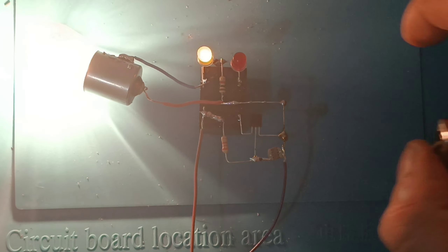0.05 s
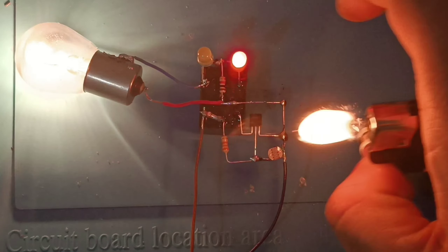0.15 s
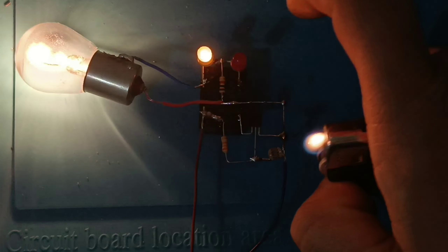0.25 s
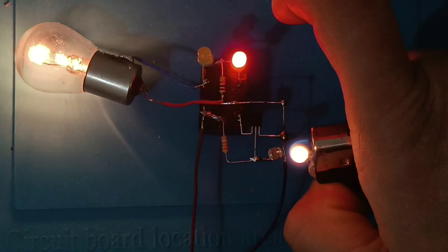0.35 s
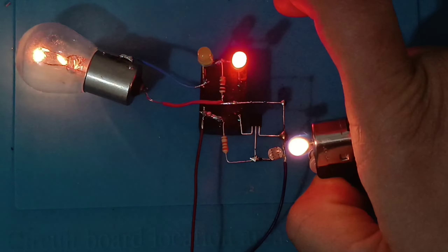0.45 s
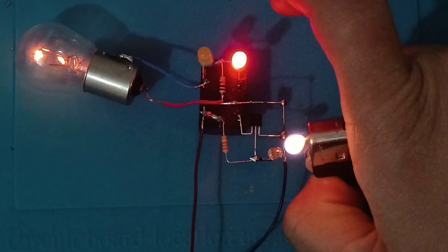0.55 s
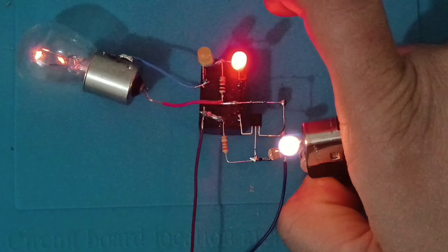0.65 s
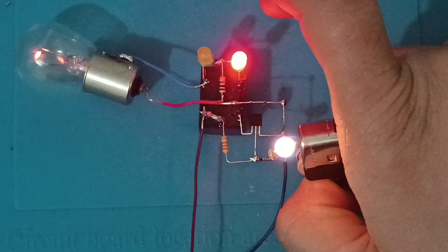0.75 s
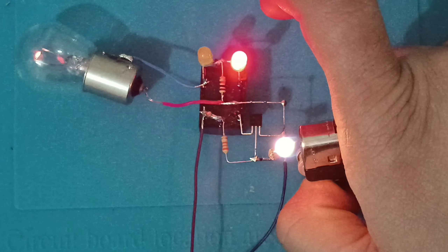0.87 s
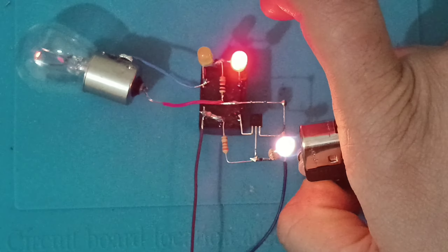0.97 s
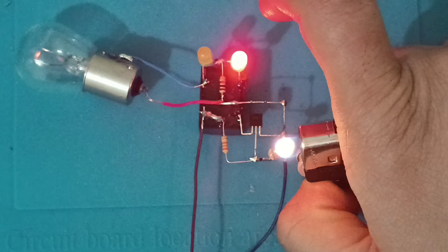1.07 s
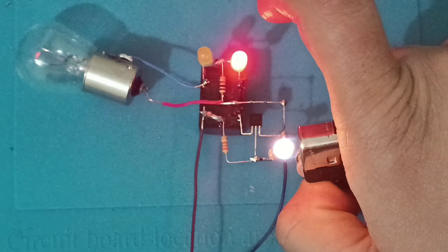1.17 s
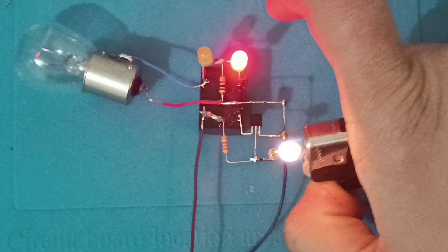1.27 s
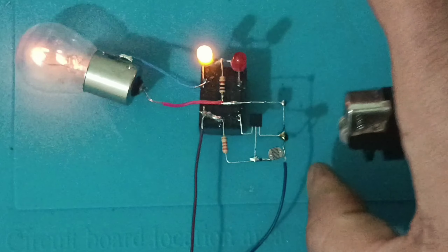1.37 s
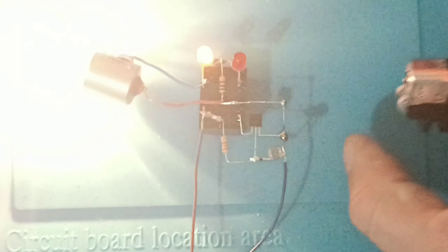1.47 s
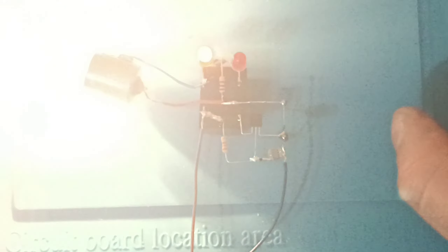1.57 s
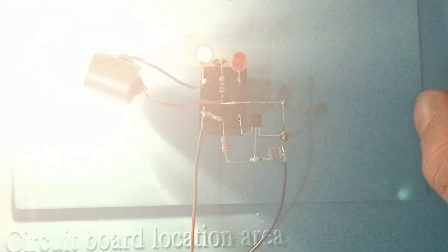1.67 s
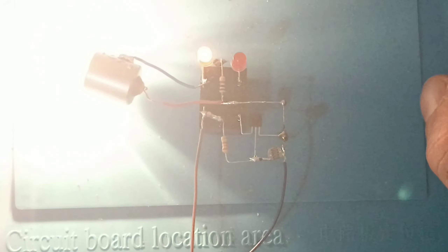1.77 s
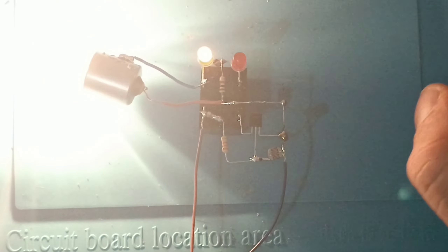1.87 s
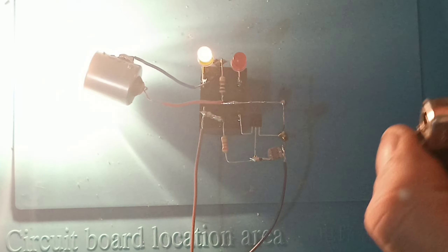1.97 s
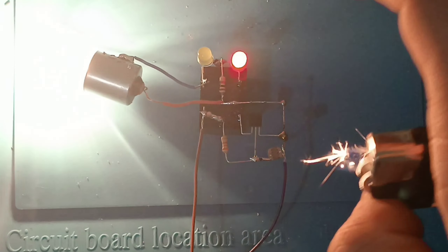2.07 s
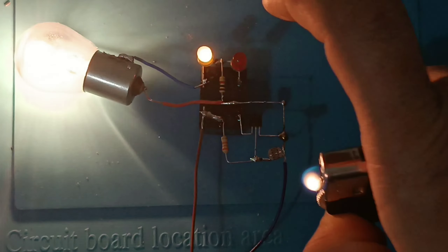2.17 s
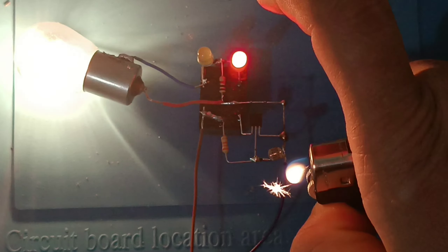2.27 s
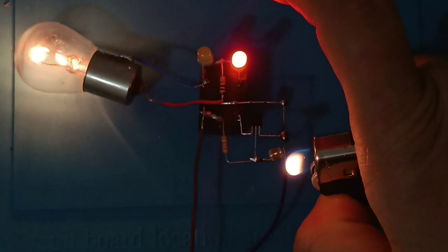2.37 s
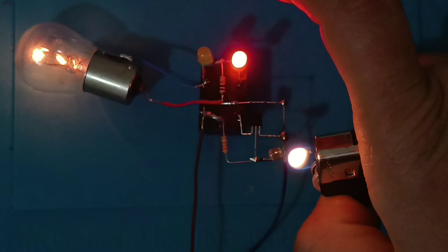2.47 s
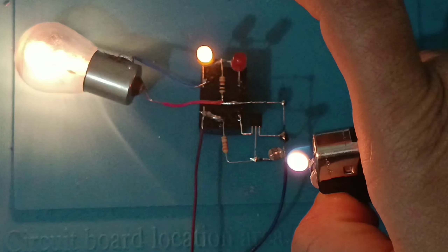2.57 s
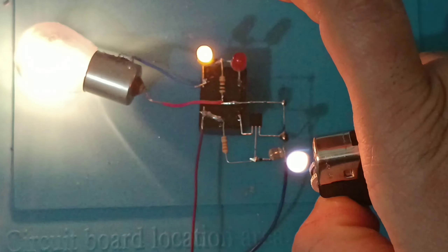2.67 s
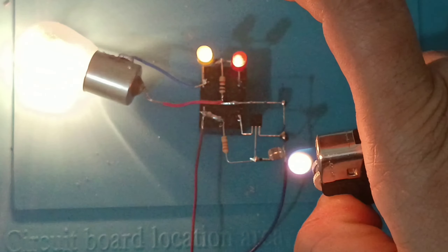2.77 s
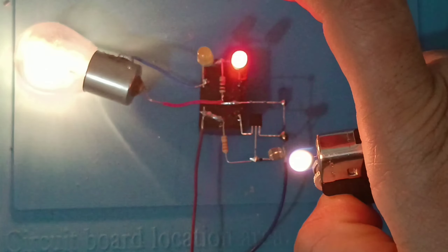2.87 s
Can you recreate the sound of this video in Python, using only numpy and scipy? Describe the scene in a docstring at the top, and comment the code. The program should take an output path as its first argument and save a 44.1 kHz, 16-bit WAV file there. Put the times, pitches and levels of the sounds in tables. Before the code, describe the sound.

Close stereo microphone in a small, lively room: two scratchy lighter strikes about two seconds apart, each followed by tiny relay clicks, the second ending in fluttering relay chatter, with soft hand bumps and faint room tone.

```python
"""Faint room tone comes first; then a flint wheel rasps and a thumb thuds onto the gas lever of a lighter.
The lighter is struck twice, close to the microphone, beside a light sensor on a table in a small live room.
A relay clicks as the flame comes and goes, and chatters when the light hovers at its threshold.
Rasp, clicks and creaks are noise bursts given the colour and ring of their bodies; the thud is a short low
wave with a boom and hum after it. The hand bumps softly and a faint tone passes."""
import sys
import numpy as np
from scipy import signal
from scipy.fft import rfft, irfft, next_fast_len
from scipy.io import wavfile
from scipy.ndimage import map_coordinates

SR = 44100
rng = np.random.default_rng(int(sys.argv[2]) if len(sys.argv) > 2 else 0)


def materialize(psi):
    """Save the field psi as 16-bit PCM at rate SR to the path in sys.argv[1].

    A 1-D psi becomes a single channel; in a 2-D psi each row is a channel.
    """
    bounded = np.clip(np.atleast_2d(psi).T, -1, 1)
    quanta = np.round(bounded * 32767).astype(np.int16)
    wavfile.write(sys.argv[1], SR, quanta)


N = 127890  # samples, 2.9 s
TOP_HZ = 15560  # upper band limit


def amp(db):
    """Turn decibels into a gain."""
    return 10 ** (np.asarray(db) / 20)


def unit(x):
    """Scale x to an average (rms) strength of 1."""
    return x / np.sqrt(np.mean(x ** 2) + 1e-20)


def clock():
    """The time of each sample, in seconds."""
    return np.arange(N) / SR


def along(points, hz):
    """Read a curve of (frequency, value) points on a logarithmic frequency axis."""
    point_hz, values = np.transpose(points)
    return np.interp(np.log(hz + 1), np.log(point_hz + 1), values)


def filtered(x, response):
    """Multiply the spectrum of x by a response that depends on frequency."""
    length = x.shape[-1]
    padded = next_fast_len(length + 8192)
    spectrum = rfft(x, padded) * response(np.fft.rfftfreq(padded, 1 / SR))
    return irfft(spectrum, padded)[..., :length]


def convolved(x, response):
    """Pass x through an impulse response, the sound a body makes when tapped once."""
    return signal.fftconvolve(np.atleast_2d(x), np.atleast_2d(response), axes=1)[:, :N]


# how alike left and right are in the close sounds: (frequency [Hz], likeness [0 to 1])
ALIKE = [(50, .4), (110, .72), (170, .92), (380, .92), (750, .6), (1500, .15), (4000, 0)]


def noise(size, alike=ALIKE):
    """Stereo hiss from a shared middle and an opposed side, mixed to set the likeness at each frequency."""
    def mid_side_gains(hz):
        angle = np.arccos(np.clip(along(alike, hz), -1, 1)) / 2
        return np.array([np.cos(angle), np.sin(angle)])

    mid, side = filtered(rng.standard_normal((2, size)), mid_side_gains)
    return np.array([mid + side, mid - side])


def body(spectrum, size=4096):
    """An impulse response of energy 1 with the given colour, starting at once (minimum phase)."""
    hz = np.fft.rfftfreq(size, 1 / SR)
    level_db = along(spectrum, hz) - 30 * (hz > TOP_HZ + 500)
    cepstrum = irfft(np.log(amp(level_db)))
    # folding the second half onto the first leaves no sound before the tap
    cepstrum[1:size // 2] *= 2
    cepstrum[size // 2 + 1:] = 0
    response = irfft(np.exp(rfft(cepstrum)))
    return response / np.linalg.norm(response)


def ringing(x, modes, t60, ring_db):
    """Add to x the fading sine tones (modes) that it sets ringing; t60 is the time to fade by 60 dB."""
    t = np.arange(SR // 3) / SR
    ring = 0
    for hz, db in modes:
        phase = rng.random((2, 1))  # in turns, separate for left and right
        ring = ring + amp(db - 60 * t / t60) * np.sin(2 * np.pi * (hz * t + phase))
    return x + amp(ring_db) * convolved(x, ring / np.linalg.norm(ring[0]))


RATTLE_T60 = 0.028  # s


def contacts(rows, crack_t60, rattle_db):
    """Noise bursts at the (time, level) rows: each a quick crack and a rattle that fades over RATTLE_T60."""
    t = np.arange(SR // 8) / SR
    crack = amp(-60 * t / crack_t60)
    rattle = amp(rattle_db - 60 * t / RATTLE_T60)
    power = np.zeros(N + SR)
    for time, db in rows:
        power[round(time * SR):][:len(t)] += amp(db) ** 2 * (crack ** 2 + rattle ** 2)
    return np.sqrt(power[:N]) * noise(N)


# steady room tone: (frequency [Hz], level [dB])
FLOOR_COLOUR = [(25, -15.5), (60, 0), (90, -1), (160, -1.5), (220, -6.5), (300, -4.5), (420, -13),
                (640, -14.5), (1200, -17.5), (2400, -18.5), (4500, -27.5), (8000, -35.5), (10500, -38.5),
                (15300, -32.5)]
# how alike left and right are in the room tone: (frequency [Hz], likeness [0 to 1])
FLOOR_ALIKE = [(50, .65), (150, .75), (300, .7), (700, .45), (2000, .3), (8000, .2)]
FLOOR_DB = -63.5
TONE_HZ, TONE_S, TONE_WIDTH_S, TONE_DB = 587, 1.65, 0.13, -70  # faint passing tone, time at its peak


def background():
    """Steady room tone of coloured noise, and a faint sine tone that swells and fades once."""
    t = clock()
    swell = np.exp(-((t - TONE_S) / TONE_WIDTH_S) ** 2 / 2)
    tone = amp(TONE_DB) * swell * np.sin(2 * np.pi * TONE_HZ * t)
    room_tone = filtered(noise(N, FLOOR_ALIKE), lambda hz: amp(along(FLOOR_COLOUR, hz)))
    return amp(FLOOR_DB) * unit(room_tone) + tone


# wheel strokes: (time of the fastest moment [s], level [dB], rise [dB/s], fall [dB/s])
STROKES = [(0.228, -28, 1090.5, 850.5), (2.1619, -29.5, 1460, 615)]
# the flint catches on a tooth: (time [s], level [dB])
CATCHES = [(.2242, -18.5), (.2305, -29), (2.1567, -38), (2.1595, -21), (2.1620, -26.5), (2.1690, -30)]
# colour of wheel on flint: (frequency [Hz], level [dB])
RASP_COLOUR = [(100, -12), (350, -3.5), (600, -7.5), (1100, -9), (1900, -3.5), (3200, 3), (4800, -6.5),
               (5700, 0.5), (8500, -7), (11000, -8), (15000, -7.5)]
# ring of the lighter's hood: (frequency [Hz], level [dB])
LIGHTER_MODES = [(1900, -0.5), (2403, -7), (2560, -1), (2990, -10), (3085, 0.5), (3450, -3.5), (4080, 3),
                 (5438, -3), (5548, -3.5), (10081, -5.5)]
LIGHTER_T60, LIGHTER_RING_DB = 0.053, -13  # s, dB


def wheel(grit_per_s=900, grit_db=-0.5):
    """The wheel scrapes the flint: noise swells, wavers with the grit and cracks at each catch; the hood rings."""
    t = clock()
    stroke = 0
    for time, db, rise, fall in STROKES:
        stroke = stroke + amp(db - np.maximum(rise * (time - t), fall * (t - time)))
    # a random curve with grit_per_s points each second
    waver = map_coordinates(rng.standard_normal(N), [t * grit_per_s], order=1)
    grit = amp(grit_db * waver)
    catches = contacts(CATCHES, crack_t60=0.013, rattle_db=-20)
    scrape = stroke * grit * noise(N) + catches
    return ringing(convolved(scrape, body(RASP_COLOUR)), LIGHTER_MODES, LIGHTER_T60, LIGHTER_RING_DB)


# the thumb lands on the lever:
# (time [s], level [dB], pitch [Hz], puff level [dB], boom level [dB], hum level [dB])
THUMPS = [(.2600, -23, 190, -28.5, -40.5, -37), (2.1907, -36.5, 269, -33, -44, -53)]
# puff of thumb on plastic: (frequency [Hz], level [dB])
PUFF_COLOUR = [(40, -22.5), (110, -0.5), (230, 1), (360, 4.5), (520, -21), (780, -5), (1200, -23.5),
               (3000, -43.5)]
# low boom of table and room: (frequency [Hz], level [dB])
BOOM_COLOUR = [(40, -21.5), (65, -9.5), (95, -13.5), (130, 2), (190, -1), (260, -2.5), (330, 3),
               (450, -11.5), (750, -11), (1500, -29.5)]
THUMP_RISE_S, THUMP_FALL_S = 0.002, 0.0059
BOOM_T60, HUM_HZ, HUM_T60 = 0.37, 186.3, 0.64  # s, Hz, s; the room hums on at its strongest mode


def thumb():
    """A short low wave and a puff of noise make the dull thud; table and room boom and hum after it."""
    t, thud = clock(), np.zeros((2, N))
    for time, db, hz, puff_db, boom_db, hum_db in THUMPS:
        swell = np.exp(-np.maximum((time - t) / THUMP_RISE_S, (t - time) / THUMP_FALL_S) ** 2 / 2)
        wave = amp(db) * np.cos(2 * np.pi * hz * (t - time))
        puff = amp(puff_db) * unit(convolved(noise(N), body(PUFF_COLOUR)))
        thud += swell * (wave + puff)
        age = np.maximum(t - time, 0)
        boom = amp(boom_db - 60 * age / BOOM_T60) * unit(convolved(noise(N), body(BOOM_COLOUR)))
        hum = amp(hum_db - 60 * age / HUM_T60) * np.sin(2 * np.pi * HUM_HZ * age)
        build_up = 1 - np.exp(-age / THUMP_FALL_S)
        thud += build_up * (boom + hum)
    return thud


# relay clicks: (time [s], case knock level [dB], bright tick level [dB])
CLICKS = [(0.3514, -50, -40), (0.403, -55, -54), (0.406, -57, -57), (1.4398, -53, -46), (1.443, -46.5, -41),
          (1.4508, -41, -39), (2.2547, -42, -42), (2.26, -38, -31), (2.3508, -28.5, -33.5),
          (2.359, -31, -51), (2.7637, -48, -43), (2.7648, -44.5, -44.5), (2.848, -53, -52),
          (2.854, -48.5, -50)]
# colour of the relay case: (frequency [Hz], level [dB])
CASE_COLOUR = [(100, -38), (350, 1.5), (620, -27.5), (1000, -3.5), (1600, -14), (2600, 2), (4200, -8.5),
               (5600, 4.5), (7400, -1), (8800, -10.5), (15000, -8)]
# colour of the contact metal: (frequency [Hz], level [dB])
TICK_COLOUR = [(2000, -15.5), (6000, -5.5), (8500, -12.5), (10200, 3), (11800, -13), (14000, 4.5),
               (15500, 1.5)]
# ring of the relay case: (frequency [Hz], level [dB])
RELAY_MODES = [(2391, 1), (2629, -5), (3004, -6), (3289, 5.5), (5240, -6), (5542, 5.5), (5740, -3),
               (6050, -12), (7448, 4)]
RELAY_T60, RELAY_RING_DB = 0.031, -11  # s, dB
TICK_T60, TICK_RATTLE_DB = 0.005, -12  # s, dB


def relay():
    """The armature, the relay's moving arm, knocks the case, which rings briefly, and the contacts tick."""
    hits = np.array(CLICKS)
    knock = convolved(contacts(hits[:, [0, 1]], crack_t60=0.0016, rattle_db=-2.5), body(CASE_COLOUR))
    tick = convolved(contacts(hits[:, [0, 2]], TICK_T60, TICK_RATTLE_DB), body(TICK_COLOUR))
    return ringing(knock, RELAY_MODES, RELAY_T60, RELAY_RING_DB) + tick


# soft bumps of the hand: (time [s], width [s], level [dB])
BUMPS = [(.40, 0.087, -53.5), (1.49, 0.082, -64), (2.24, 0.033, -51.5), (2.41, 0.065, -59),
         (2.61, 0.017, -54.5), (2.675, 0.034, -54.5), (2.82, 0.045, -57.5)]
# colour of the bumps: (frequency [Hz], level [dB])
HAND_COLOUR = [(25, -24.5), (65, -13.5), (100, -1), (170, 3), (240, -5.5), (320, -5), (500, -20.5),
               (1200, -39.5)]


def handling():
    """Soft low swells of noise as the hand shifts."""
    t, level = clock(), 0
    for time, width, db in BUMPS:
        level = level + amp(db) * np.exp(-((t - time) / width) ** 2 / 2)
    return level * unit(convolved(noise(N), body(HAND_COLOUR)))


# the lever slides back up under the thumb: (time [s], level [dB])
SLIPS = [(1.3975, -50.5), (1.402, -47.5), (1.408, -57), (1.4165, -51.5), (1.4225, -57), (1.427, -76)]
# colour of the lever: (frequency [Hz], level [dB])
LEVER_COLOUR = [(150, -23), (800, -11.5), (2100, -3.5), (2700, -9), (3300, 4.5), (5000, -13.5), (8000, -18),
                (15000, -29)]


def lever():
    """The gas lever creaks back in a few small slips, each a burst of noise."""
    return convolved(contacts(SLIPS, crack_t60=0.025, rattle_db=-11), body(LEVER_COLOUR))


# relay chatter:
# (start time [s], length [s], knock level at the start [dB], knock level at the end [dB], tick level [dB])
CHATTER = [(2.583, 0.05, -46, -43.5, -42), (2.629, .038, -42, -51, -47.5), (2.699, 0.017, -67, -43, -51.5),
           (2.849, 0.0089, -52, -48, -40), (2.88, 0.011, -51, -41.5, -50)]
# colour of the case under light, fast taps: (frequency [Hz], level [dB])
BUZZ_COLOUR = [(100, -43), (330, 0.5), (700, -15), (1800, -14), (2500, 3), (3500, -0.5), (4900, -5.5),
               (5800, 1), (7400, -2), (8600, -10), (15000, -18)]
CHATTER_PER_S = 190  # average taps per second
CHATTER_SCATTER, CHATTER_SPREAD_DB = 0.58, 1.6  # random timing [tap spacings], random level [dB]
CHATTER_T60, CHATTER_RATTLE_DB = 0.004, -6  # s, dB


def chatter(count=24):
    """The armature flutters: bursts of light taps, uneven in timing and level, knock the case and tick."""
    taps = []
    for start, length, first_db, last_db, tick_db in CHATTER:
        late, loud = rng.standard_normal((2, count))
        age = np.maximum(np.arange(count) + CHATTER_SCATTER * late, 0) / CHATTER_PER_S
        spread_db = CHATTER_SPREAD_DB * loud
        knock_db = np.interp(age, [0, length], [first_db, last_db]) + spread_db
        burst = np.transpose([start + age, knock_db, tick_db + spread_db])
        taps += list(burst[age < length])
    taps = np.array(taps)
    knock = convolved(contacts(taps[:, [0, 1]], CHATTER_T60, CHATTER_RATTLE_DB), body(BUZZ_COLOUR))
    tick = convolved(contacts(taps[:, [0, 2]], TICK_T60, TICK_RATTLE_DB), body(TICK_COLOUR))
    return knock + tick


# how long the room's tail takes to fade by 60 dB: (frequency [Hz], time [s])
ROOM_T60 = [(100, 0.32), (200, 0.57), (700, .45), (2500, 0.42), (6000, 0.32), (14000, 0.17)]
ROOM_BUILD_S = 0.0037


def room(x, wet_db, count=10):
    """Add the room's tail of fading noise, redrawn for each of count stretches so that it varies a little."""
    out = x.copy()
    for part in np.array_split(np.arange(N), count):
        hz, t, grid = signal.stft(noise(SR * 2 // 3), SR, nperseg=256)
        build_up = 1 - np.exp(-t / ROOM_BUILD_S)
        fade = amp(-60 * t / along(ROOM_T60, hz)[:, None]) * build_up
        tail = signal.istft(grid * fade, SR, nperseg=256)[1]
        start = part[0]
        wet = convolved(x[:, part], tail / np.linalg.norm(tail[0]))[:, :N - start]
        out[:, start:start + wet.shape[1]] += amp(wet_db) * wet
    return out


# stereo lean of the close sounds: (frequency [Hz], left minus right level [dB])
LEAN = [(300, .5), (1200, 1.5), (2500, 1), (3500, 0), (6000, -3), (8500, -1.5), (11500, 12.5),
        (15000, 10.5)]


def scene():
    """Lighter, thumb and relay sound in the room, leaning to one side, over hand bumps and room tone."""
    close = room(wheel(), wet_db=-7.5)
    close += room(thumb(), wet_db=-14)
    close += room(relay() + lever(), wet_db=-4.5)
    close += room(chatter(), wet_db=1.5)
    half_each_way = np.array([[.5], [-.5]])
    close = filtered(close, lambda hz: amp(along(LEAN, hz) * half_each_way))
    return close + handling() + background()


def record(dry, low_cut_hz=45):
    """The microphone weakens the deepest bass; a steep filter removes what lies above the band limit."""
    thin = filtered(dry, lambda hz: hz ** 2 / np.sqrt(hz ** 4 + low_cut_hz ** 4))
    return filtered(thin, lambda hz: 1 / (1 + (hz / TOP_HZ) ** 120))


dry = scene()
out = record(dry)
materialize(out)
```